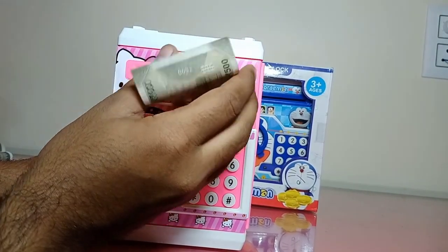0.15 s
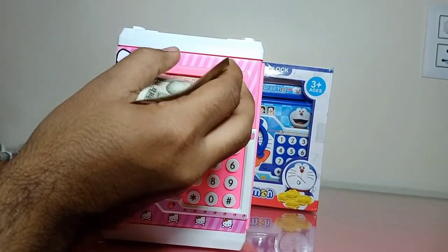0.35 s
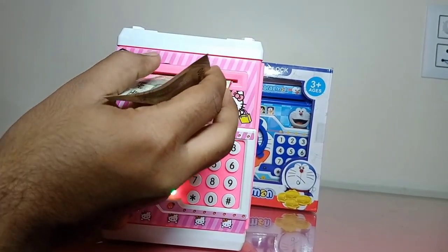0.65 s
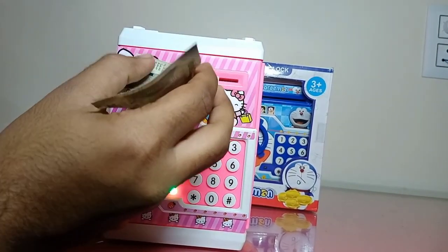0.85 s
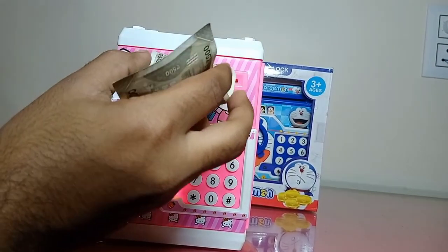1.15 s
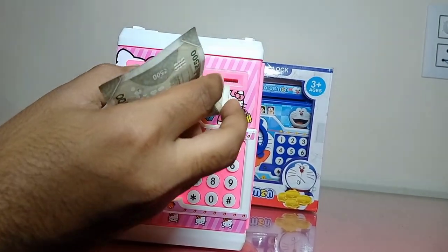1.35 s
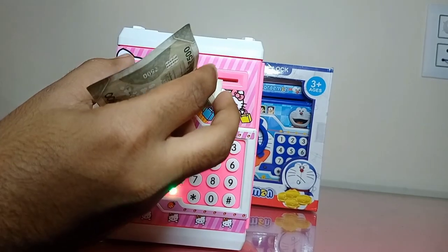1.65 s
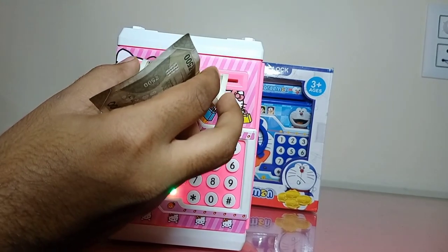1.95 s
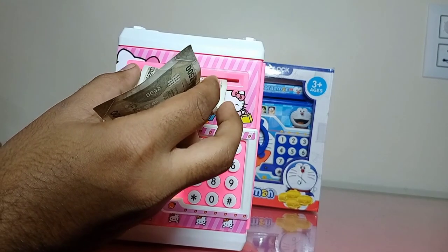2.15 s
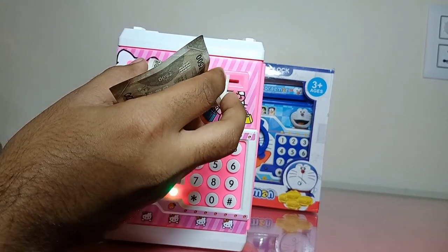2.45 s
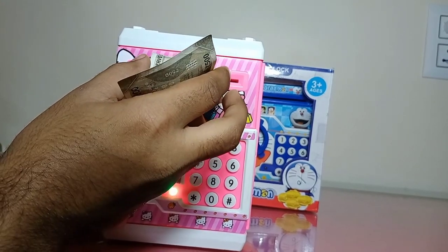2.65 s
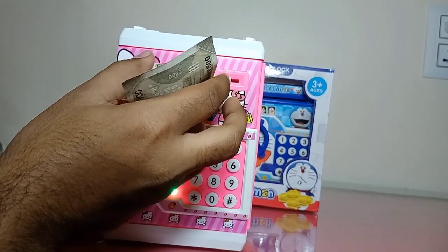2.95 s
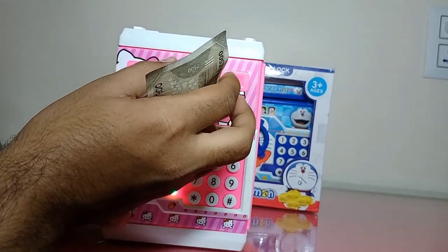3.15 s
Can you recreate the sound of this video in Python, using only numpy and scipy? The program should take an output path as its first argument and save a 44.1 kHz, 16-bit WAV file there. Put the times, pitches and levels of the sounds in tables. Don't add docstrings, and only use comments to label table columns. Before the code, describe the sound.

A small geared motor in a plastic toy bank buzzes harshly, coasts to a stop in a few knocks, then a short thumb squeak and faint paper rustles, close in a quiet room.

```python
import sys
import numpy as np
from scipy import signal
from scipy.fft import rfft, irfft
from scipy.io import wavfile
from scipy.ndimage import map_coordinates

SR = 44100
rng = np.random.default_rng(int(sys.argv[2]) if len(sys.argv) > 2 else 0)


def int16_out(signal):
    q = np.round(np.clip(np.atleast_2d(signal).T, -1, 1) * 32767)
    wavfile.write(sys.argv[1], SR, q.astype(np.int16))


def level_to_linear(level):
    exponent = np.asarray(level, float) / 20
    return 10 ** exponent


N = 145530
T = np.arange(N) / SR


def rms_one(x):
    return x / np.sqrt(np.mean(x ** 2) + 1e-20)


def curve(rows):
    return np.interp(T, *np.transpose(rows))


def drift(rate_hz):
    knots = rng.standard_normal(2000)
    return map_coordinates(knots, [T * rate_hz * 2 + 2], order=3)


def grains(per_s, spread_db):
    clicks = rng.random(N) < per_s / SR
    size = level_to_linear(spread_db * np.minimum(rng.exponential(1, N), 4))
    return clicks * size * rng.choice([-1, 1], N)


def peak(x, hz, width_hz):
    r = np.exp(-np.pi * width_hz / SR)
    return signal.lfilter([(1 - r * r) / 2, 0, (r * r - 1) / 2],
                          [1, -2 * r * np.cos(2 * np.pi * hz / SR), r * r], x + 1e-18)


def filtered(x, order, hz, kind="low"):
    return signal.sosfilt(signal.butter(order, hz, kind, fs=SR, output="sos"), x)


def soft(x):
    return filtered(x, 3, 4200)


def thin(x):
    return filtered(x, 4, 6300, "high")


def strike(s, db, modes):
    out = 0
    luck_db = rng.normal(0, 2.4, (len(s), len(modes)))
    for k, (hz, mode_db, t60) in enumerate(modes):
        clicks = np.full(N, 1e-18)
        level_db = np.array(db) + mode_db - 3.5 + luck_db[:, k]
        clicks[(np.array(s) * SR).astype(int)] = (-1) ** k * level_to_linear(level_db)
        r, w = 10 ** (-3 / (t60 * SR)), 2 * np.pi * hz / SR
        out = out + signal.lfilter([0, np.sin(w)], [1, -2 * r * np.cos(w), r * r], clicks)
    return out


# f/Hz, level/dB, t60/s
EDGE_MODES = [(7600, -4, .006), (8600, -1, .008), (10800, -5, .004), (13800, -2, .004), (15200, -4, .004)]


def edge_tick(s, db):
    return thin(strike(s, db, EDGE_MODES))


# f/Hz, width/Hz, level/dB
CASE_MODES = [(230, 140, -14.5), (605, 300, -8), (945, 140, -5.5), (1210, 120, -4.5), (1528, 110, -3.5),
              (1979, 140, -2), (2294, 170, -0.5), (3000, 360, -1.5), (3730, 390, -5), (5067, 900, -12.5),
              (6957, 570, -17), (8510, 950, -12.5), (10900, 1200, -23.5), (13500, 2500, -22.5)]


def case(x):
    return sum((-1) ** k * level_to_linear(db) * peak(x, hz, w) for k, (hz, w, db) in enumerate(CASE_MODES))


def gear_rattle(turns, since):
    depth, burst_s = .42, .003
    turn_luck = level_to_linear(1.5 * rng.standard_normal(600))
    burst = np.exp(-since / burst_s) * turn_luck[turns.astype(int)]
    chatter = rms_one(grains(9000, 3.0)) + 0.65 * rng.standard_normal(N)
    return level_to_linear(-0.99) * rms_one(case(chatter * (1 - depth + 3.0 * depth * burst)))


# t/s, level/dB re drive
BINDING = [
    (0, -12),
    (.06, -7),
    (.1, -10),
    (.145, -5.5),
    (.19, -1),
    (.198, -16),
    (.21, -6.5),
    (.225, -12),
    (.245, -8.5),
]


def worn_tooth(since):
    knock_hz, width_hz, knock_s = 3110, 1300, .003
    knock = np.exp(-since / knock_s) * grains(18000, 1.5)
    ring = peak(peak(knock, knock_hz, width_hz), knock_hz, 2 * width_hz)
    return level_to_linear(curve(BINDING)) * rms_one(ring)


# multiple, level/dB re drive, swing/dB as the slow gears turn, crest t/s, period/s
SHAFT_ORDERS = [(1, -18, 3.5, 0.07, .5), (2, -19.5, 2.5, 0.011, 0.094), (3, -15.5, 6, 0.125, 0.148),
                (4, -13.5, 6, .03, 0.19), (5, -14, 3.5, 0.066, 0.098), (6, -20.5, 4, 0.077, 0.13),
                (8, -20, 4, 0.096, .15)]


def shaft_hum(speed, turns):
    turns = turns + np.cumsum(.005 * speed * drift(18)) / SR
    swell_db = 6 * (1 - speed / 140)
    hum = 0
    for multiple, db, swing_db, crest_s, period_s in SHAFT_ORDERS:
        swing = swing_db * np.cos(2 * np.pi * (T - crest_s) / period_s)
        level = level_to_linear(db + swell_db + swing + 1.6 * drift(25))
        hum = hum + level * np.sin(2 * np.pi * (multiple * turns + rng.random()))
    return hum


# t/s, speed/turns per s
SHAFT_SPEED = [
    (0, 145),
    (.06, 149),
    (.11, 140),
    (.19, 140.3),
    (.225, 146),
    (.255, 125),
    (.29, 122),
    (.345, 85),
]
# t/s, level/dB
DRIVE_LEVEL = [
    (0, -23.5),
    (.12, -22.5),
    (.18, -22),
    (.255, -23.5),
    (.285, -28.5),
    (.31, -38),
    (.33, -34.5),
    (.35, -48),
    (.39, -61),
]


def motor():
    speed = curve(SHAFT_SPEED)
    turns = np.cumsum(speed) / SR
    since = turns % 1 / speed
    drive = level_to_linear(curve(DRIVE_LEVEL)) * (T < DRIVE_LEVEL[-1][0])
    return drive * (gear_rattle(turns, since) + worn_tooth(since) + shaft_hum(speed, turns))


# f/Hz, level/dB per Hz
AIR_COLOUR = [(25, -42.5), (55, -6.5), (200, -2.5), (500, -9), (2500, -15.5), (3600, -20), (6000, -39),
              (15800, -41.5)]
# start t/s, length/s, f/Hz, width/Hz, level/dB
FAR_DRONES = [
    (0, .3, 60, 83, -65),
    (.25, 0.24, 100, 50, -56),
    (1.64, .2, 65, 40, -74),
    (2.9, .14, 60, 50, -76),
    (0.365, 0.36, 149, 100, -60.5),
    (0.54, 0.56, 390, 450, -67.5),
    (1.519, 0.14, 410, 48, -67),
    (1.613, 0.39, 333.4, 230, -69),
    (2.202, 0.31, 198, 9.6, -78),
    (2.678, 0.19, 198, 10.2, -73.5),
]


def room_tone():
    hz, db = np.transpose(AIR_COLOUR)
    f = np.maximum(np.arange(N // 2 + 1) * SR / N, 1)
    colour = level_to_linear(np.interp(np.log(f), np.log(hz), db))
    air = rms_one(irfft(rfft(rng.standard_normal(N)) * colour, N))
    hum = rms_one(peak(rng.standard_normal(N), 198, 3.8))
    out = level_to_linear(-68.5 + .8 * drift(3)) * air + level_to_linear(-78.5) * hum
    for s, length_s, drone_hz, width_hz, level_db in FAR_DRONES:
        fade_in = np.clip((T - s) / 0.01, 0, 1)
        fade_out = np.clip(1.52 * (s + length_s - T) / length_s, 0, 1)
        drone = peak(peak(rng.standard_normal(N), drone_hz, width_hz), drone_hz, width_hz)
        out = out + level_to_linear(level_db) * fade_in * fade_out * rms_one(drone)
    return out


# t/s, peak level/dB
LAST_TEETH = [
    (0.251, -10.5),
    (0.2588, -14),
    (0.2825, -15.5),
    (0.2974, -15.5),
    (0.3249, -21.5),
    (0.3345, -21.5),
]
# f/Hz, level/dB, t60/s
TOOTH_MODES = [(1530, -8.5, 0.022), (2095, -5.5, .01), (3050, -2, 0.014), (3700, -7.5, 0.0078),
               (5230, -10.5, 0.0089), (6500, -14.5, .008)]
# f/Hz, level/dB, t60/s
HOLLOW_MODES = [(199, -14, .09), (276.7, -17, 0.08), (372, -8.5, 0.065), (415, -17, .04),
                (625.4, -11.5, 0.051), (1208, -10, 0.038)]


def coasting_gears():
    s, db = np.transpose(LAST_TEETH)
    return strike(s, db, TOOTH_MODES) + edge_tick(s, db - 13.5) + strike(s, db - 2.5, HOLLOW_MODES)


# t/s, rustle level/dB
FINGER_PRESSURE = [(.45, -78), (.6, -75), (.645, -75.5), (.66, -101), (.74, -82.5), (.87, -88.5),
                   (1.05, -88), (1.16, -96), (1.6, -100), (1.68, -94), (1.8, -99), (2.1, -88), (2.17, -89),
                   (2.28, -84.5), (2.4, -103), (2.78, -83), (2.9, -99), (3.08, -94)]


def rustle():
    paper = rms_one(case(grains(700 * level_to_linear(5.0 * drift(30)), 2.5)))
    return level_to_linear(curve(FINGER_PRESSURE) + 13) * (T > FINGER_PRESSURE[0][0]) * paper


def thumb():
    slip_s, length_s, squeak_hz = .508, 0.0363, 394.4
    t = T - slip_s
    gate = np.clip(t / .003, 0, 1) * np.clip((length_s - t) / .005, 0, 1)
    level = level_to_linear(-35.5 - 2.5 * np.clip(t / length_s, 0, 1) + 3.2 * drift(69.4))
    phase = 2 * np.pi * squeak_hz * t
    squeak = level * gate * (np.sin(phase) + 0.067 * np.sin(2 * phase))
    knock = strike([slip_s + 0.00219], [-31], [(223, -9.5, 0.053), (435, 2, .025), (650, 1, 0.025),
                                             (960, -5.5, 0.022), (1270, -13, 0.023)])
    skin = case(grains(5150, 1.2))
    rub = rms_one(soft(skin)) + level_to_linear(-9) * rms_one(thin(skin))
    swell = np.clip((t + 0.005) / 0.0058, 0, 1) * np.exp(-np.maximum(t - .011, 0) / 0.017)
    return squeak + knock, level_to_linear(-42.5) * swell * rub


def table_bump():
    bump_s, t60_s = 0.537, 0.88
    fade_in = np.clip((T - bump_s) / 0.027, 0, 1)
    fade_out = np.clip((bump_s + t60_s / 3.1 - T) / 0.031, 0, 1)
    return level_to_linear(-66) * fade_in * fade_out * rms_one(peak(rng.standard_normal(N), 54, 33))


# t/s, peak level/dB, treble level/dB re peak
PAPER_SNAPS = [(0.5897, -45, -19), (0.6144, -54.5, -18), (0.9744, -61.5, -15.5), (0.9852, -56.5, -27.5),
               (1.005, -60.5, -16), (1.0332, -51, -32), (1.0582, -53, -14), (1.0672, -54, -34),
               (1.0706, -51, -31), (1.073, -55, -31), (1.11, -45, -38), (1.1186, -53, -35),
               (1.1273, -58, -35), (1.6183, -34, -38), (1.634, -42.5, -27), (1.6808, -41.5, -32),
               (1.7008, -52, -15), (1.9257, -66, -15.5), (1.94, -59, -16.5), (1.99, -62.5, -19.5),
               (2.053, -68.5, -11), (2.063, -65, -16), (2.0781, -62, -11), (2.0943, -56.5, -15),
               (2.107, -62, -12), (2.131, -60.5, -20), (2.188, -61.5, -20), (2.213, -66, -12),
               (2.2278, -61, -12), (2.2513, -56, -24), (2.4695, -66, -6), (2.6082, -63, -17),
               (2.7241, -63, -21), (2.7543, -55.5, -20), (2.7728, -62, -12), (2.8174, -66, -10),
               (2.8313, -58, -15), (2.9795, -58, -20), (2.9866, -51, -20), (3.0, -61, -30),
               (3.042, -59, -21)]
# f/Hz, level/dB, t60/s
NOTE_MODES = [(1044, -7.5, .012), (1520, -6, 0.013), (2344, 4.5, .01), (2850, -2, 0.0074),
              (3350, -4, 0.0069), (5040, -18, 0.0072)]


def creases():
    s, db, treble_db = np.transpose(PAPER_SNAPS)
    edge_db = db + treble_db + 8.5
    snaps = soft(strike(s, db, NOTE_MODES)) + edge_tick(s, edge_db)
    after = np.zeros((2, N))
    after[:, (s * SR).astype(int)] = level_to_linear([db, edge_db])
    crackle_s = .035
    after = signal.lfilter([1], [1, -np.exp(-1 / (crackle_s * SR))], after)
    crackle = rms_one(case(grains(2500, 3.5)))
    low = rms_one(filtered(crackle, 2, 2840))
    high = rms_one(thin(crackle))
    return snaps + level_to_linear(-26) * (after[0] * low + level_to_linear(1) * after[1] * high)


# crest t/s, swell/s, level/dB, fade/s, f/Hz
EDGE_SCRAPES = [(1.0595, .01, -47.5, .003, 2320), (1.1, .004, -60.5, 0.0027, 3600),
                (1.057, 0.0044, -55, .002, 2900), (2.7, .008, -56.5, 0.0045, 2450),
                (2.984, 0.0086, -60, .008, 460), (2.985, .007, -65, .005, 1300),
                (2.986, .007, -69.5, .004, 4200), (3.3, .003, -68, .006, 800),
                (2.7555, .0015, -59.5, .007, 3100), (2.778, .006, -63.5, .014, 2600),
                (2.778, 0.0054, -63.5, 0.01, 850), (2.6, .003, -63, 0.0064, 2400),
                (2.611, 0.0027, -65, .005, 2640), (2.726, .008, -66, .006, 2800)]


def scrapes():
    width_hz = 420
    rub = grains(6000, 2.7)
    out = 0
    for crest_s, swell_s, db, fade_s, hz in EDGE_SCRAPES:
        swell = np.clip(1 + (T - crest_s) / swell_s, 0, 1)
        fade = np.exp(-np.maximum(T - crest_s, 0) / fade_s)
        out = out + level_to_linear(db) * swell * fade * rms_one(peak(peak(rub, hz, width_hz), hz, 2 * width_hz))
    return out


# f/Hz, level/dB, t60/s
TAP_MODES = [(302, -1, 0.058), (421, 4.5, 0.033), (540, -3, 0.036), (1000, -8, 0.045)]


def knuckle_tap():
    return strike([2.838], [-53.5], TAP_MODES)


def room(x):
    t60_s = 0.46
    t = T[:SR]
    noise = rng.standard_normal(SR) * np.clip((t - .004) / 0.017, 0, 1)
    low = filtered(noise, 1, 2480)
    tail = low * level_to_linear(-60 * t / t60_s) + (noise - low) * level_to_linear(-60 * t / (0.53 * t60_s))
    return signal.fftconvolve(x, tail / np.sqrt(np.sum(tail ** 2)))[:N]


def scene():
    squeak, scuff = thumb()
    banknote = rustle() + creases() + scrapes()
    near = motor() + coasting_gears() + scuff + banknote + knuckle_tap()
    wet = room(near + level_to_linear(-10) * squeak)
    near = near + squeak + level_to_linear(-11) * wet
    return (filtered(near, 3, 120, "high") + table_bump() + room_tone())[None]


def band_limit(x):
    return signal.sosfilt(signal.butter(12, 15900, fs=SR, output="sos"), x)


def record(dry):
    low_pass = signal.ellip(14, .5, 70, 15770, fs=SR, output="sos")
    mix = signal.sosfilt(low_pass, dry)
    return band_limit(mix)


dry = scene()
out = record(dry)
int16_out(out)
```